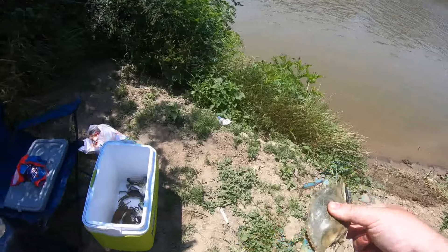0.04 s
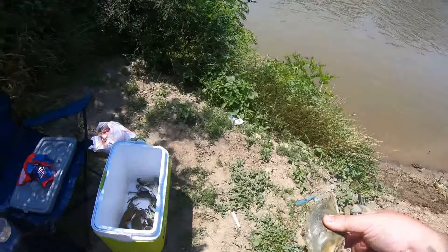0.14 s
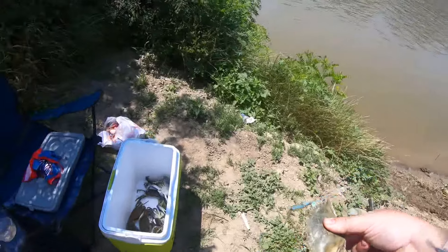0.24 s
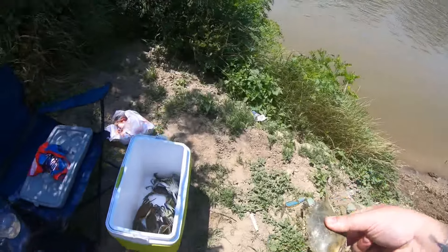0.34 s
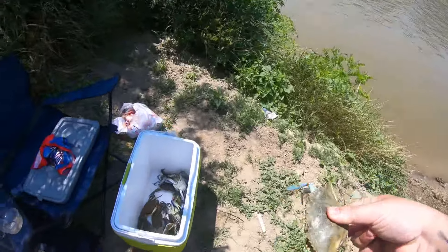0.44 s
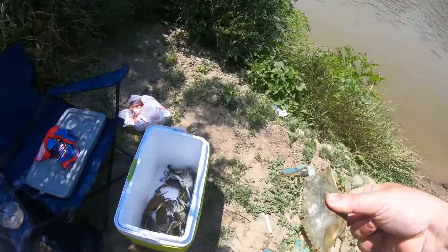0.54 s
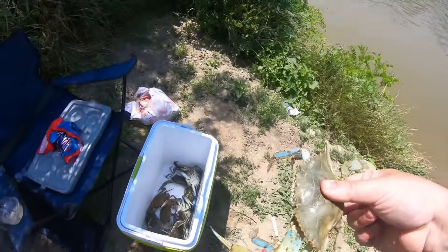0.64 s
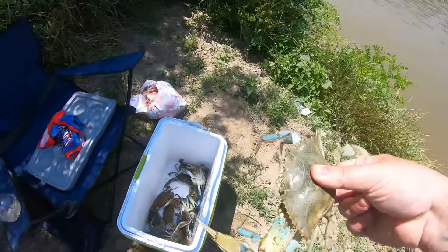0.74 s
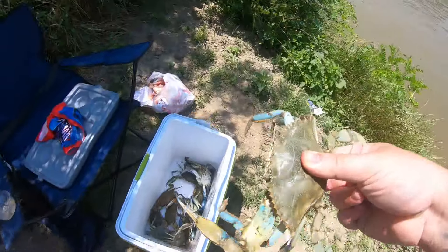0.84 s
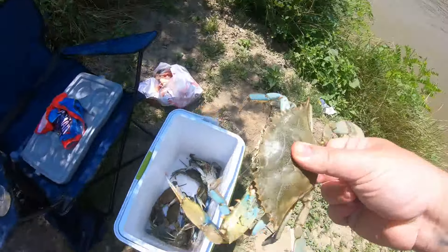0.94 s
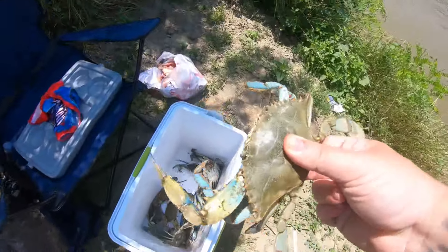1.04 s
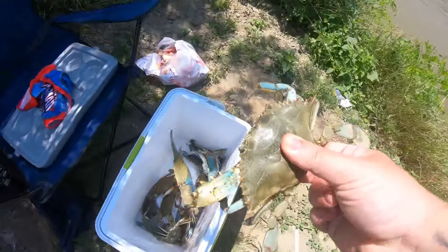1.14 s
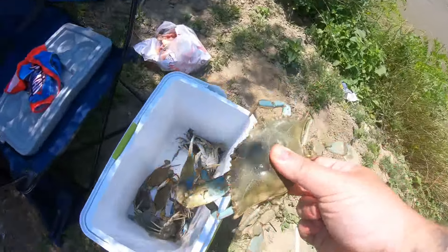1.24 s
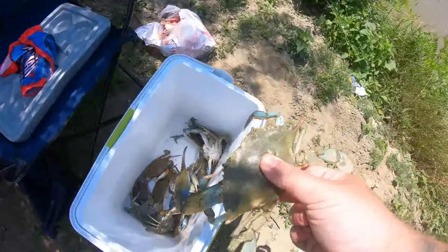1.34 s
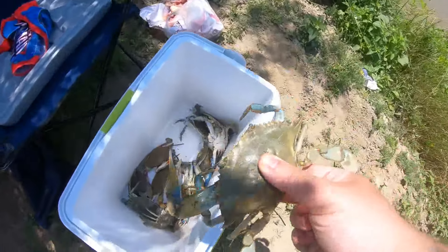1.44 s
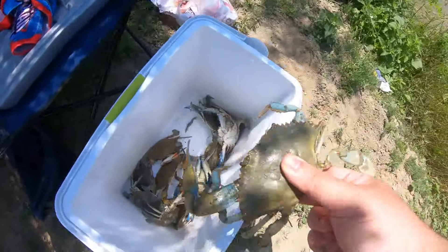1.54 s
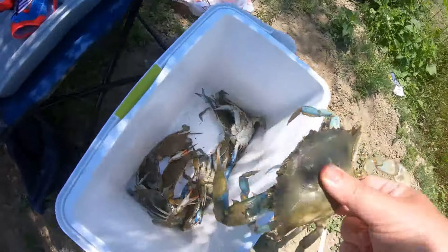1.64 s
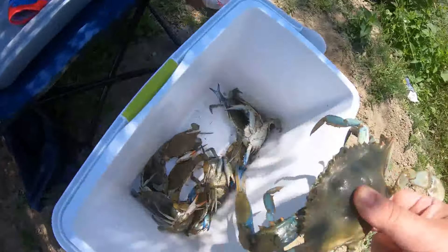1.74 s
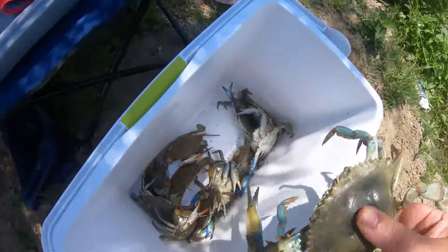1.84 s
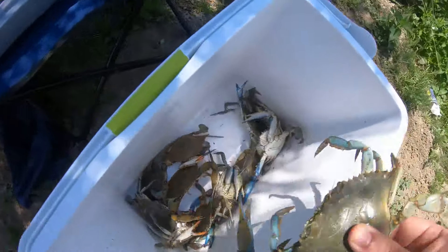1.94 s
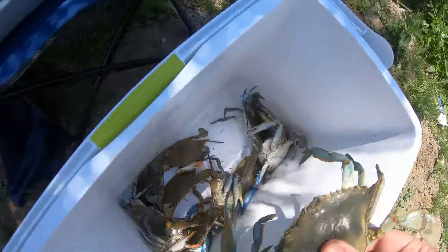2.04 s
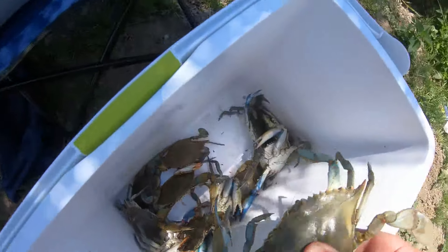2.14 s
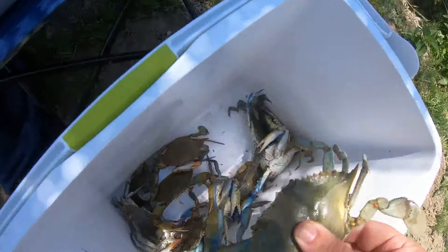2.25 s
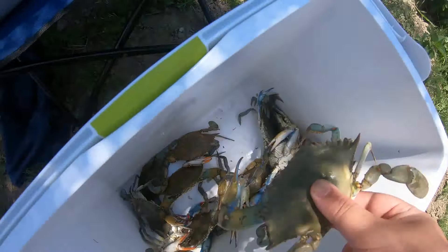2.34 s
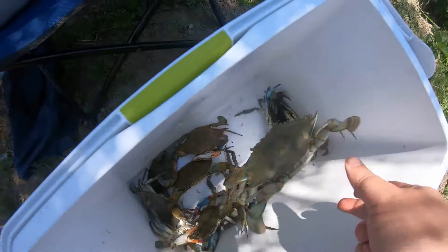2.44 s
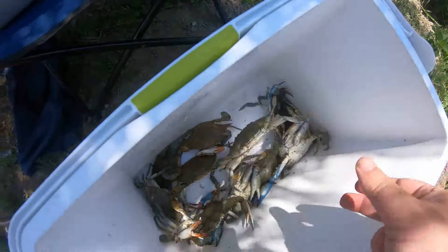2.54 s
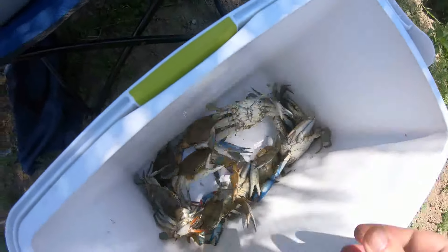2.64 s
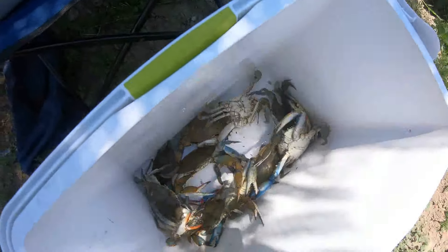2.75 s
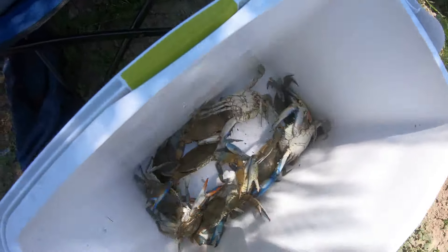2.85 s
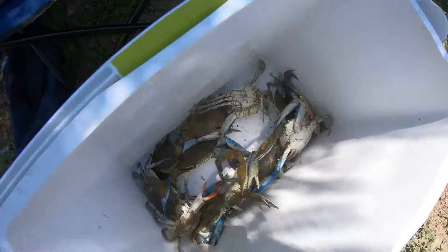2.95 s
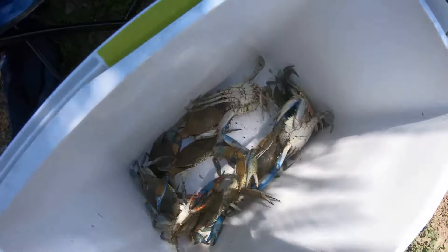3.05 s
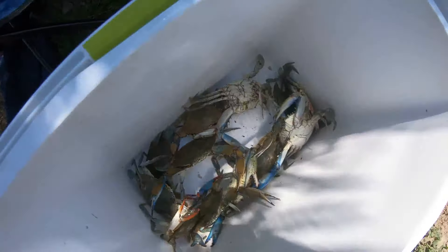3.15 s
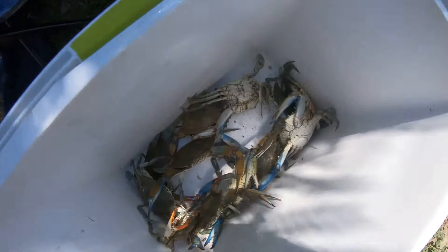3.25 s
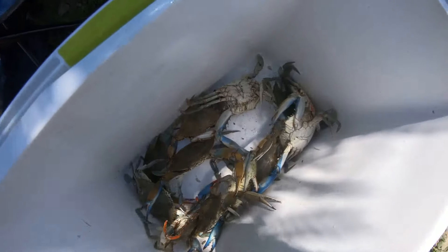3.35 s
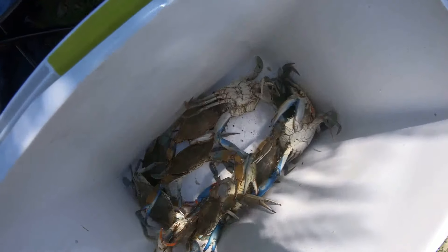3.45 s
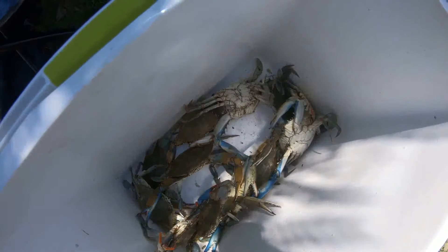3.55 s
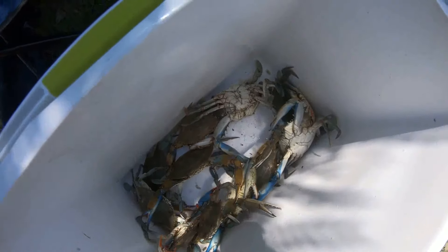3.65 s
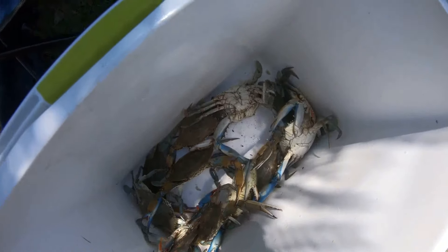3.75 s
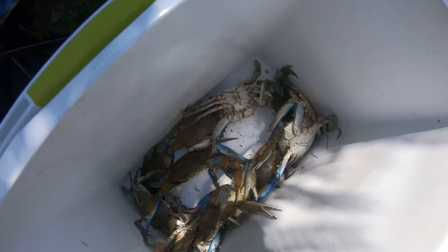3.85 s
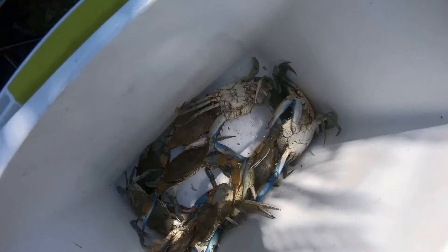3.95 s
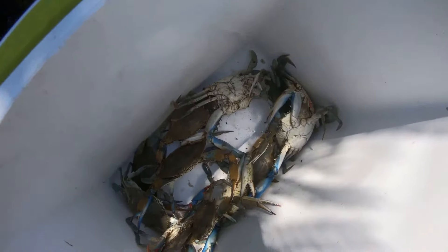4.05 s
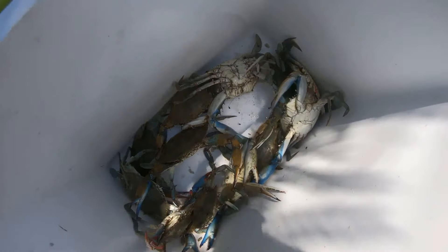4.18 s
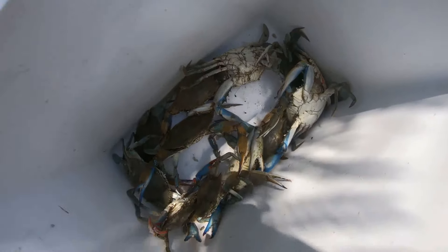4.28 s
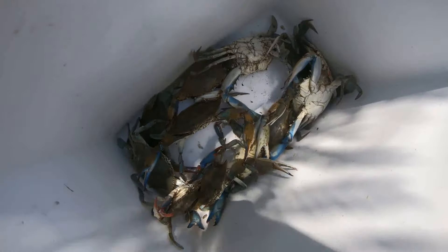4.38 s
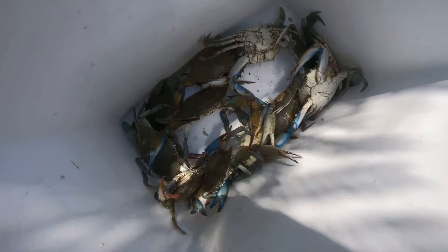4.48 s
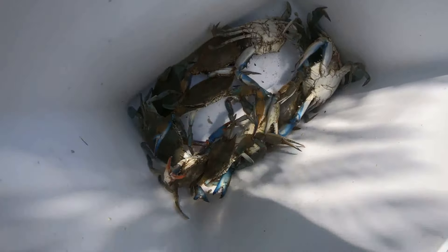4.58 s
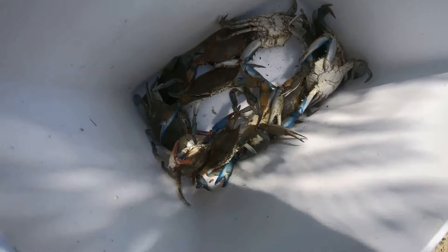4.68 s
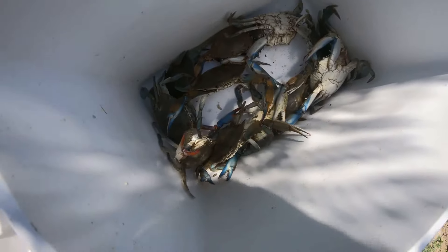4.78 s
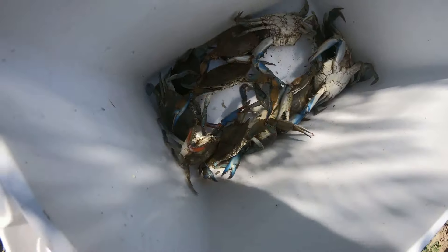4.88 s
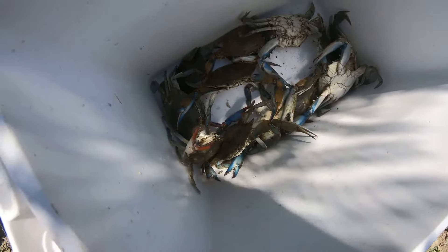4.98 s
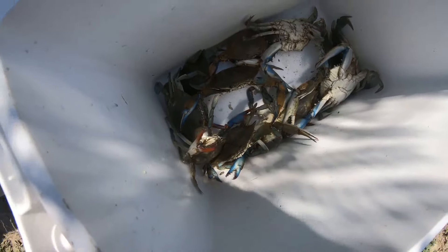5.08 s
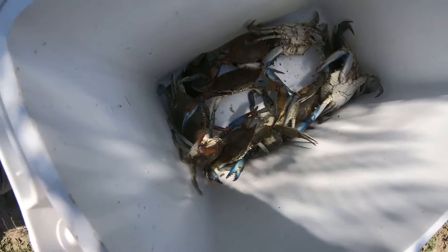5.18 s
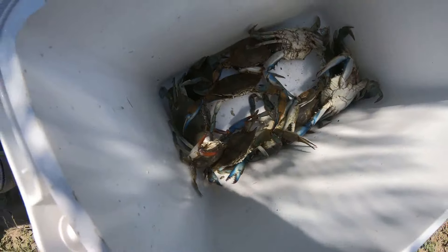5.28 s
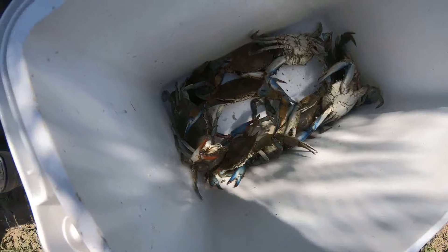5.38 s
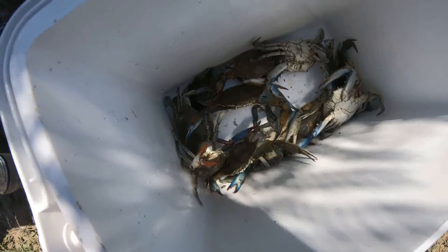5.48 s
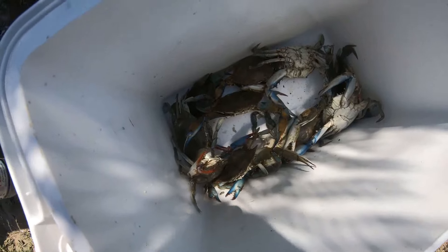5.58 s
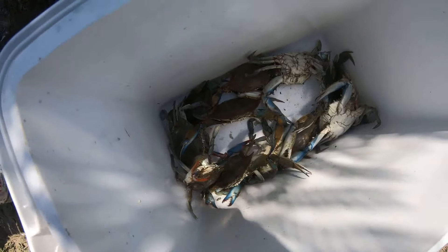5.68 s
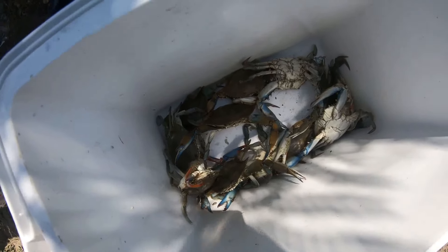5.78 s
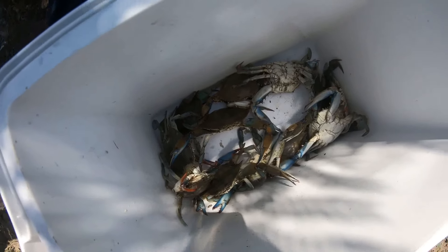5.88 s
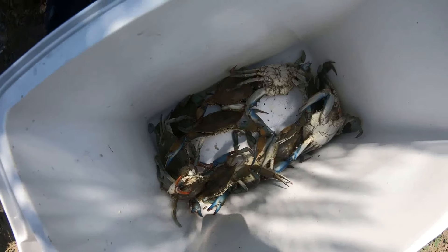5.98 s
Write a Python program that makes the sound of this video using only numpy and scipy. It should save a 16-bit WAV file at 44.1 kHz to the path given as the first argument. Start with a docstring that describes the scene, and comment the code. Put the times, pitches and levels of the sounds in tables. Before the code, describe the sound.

Outdoors with light wind rumble and a fading insect hiss, a crab drops into a plastic cooler with a hard hollow bang, claws rattling, then quieter ticking.

```python
"""Crab dropped into a cooler

A live crab is carried to a plastic cooler on a river bank and dropped onto the others.
Short bursts of noise ring like shells and plastic; fading low tones make the hollow walls boom.
One effort curve drives the scrabbling, light taps and soft nudges, and sinks as the crabs settle.
Behind them, shaped noise makes insects, open air and light wind; low tones make a far engine's hum."""
import sys
import numpy as np
from scipy import signal
from scipy.fft import rfft, irfft
from scipy.io import wavfile
from scipy.ndimage import uniform_filter1d

SR = 44100
rng = np.random.default_rng(int(sys.argv[2]) if len(sys.argv) > 2 else 0)


def generate_wav(sig):
    """Save sig (samples, or channels by samples) to the path in sys.argv[1] as 16-bit PCM at SR."""
    pcm = np.round(np.clip(np.atleast_2d(sig).T, -1, 1) * 32767).astype(np.int16)
    wavfile.write(sys.argv[1], SR, pcm)


N = 265482
TIME = np.arange(N) / SR

# blows on the cooler: [t/s, boom peak level/dB, favoured f/Hz,
# hard knock level/dB against the peak before a 2 dB cut, ring time as a factor on the walls' own]
THUMPS = [(.038, -37, 290, -2, 0.058), (0.065, -34, 225, -12, 0.17), (1.195, -37, 180, -27, 2.9),
          (1.3, -23.5, 265, -22, 0.26), (1.4299, -20, 225, -34, 0.78), (2.052, -37.5, 209, -14, 1.1),
          (2.353, -26.5, 249, -30, 0.77), (2.487, -30, 173, -42, 1.6), (2.515, -35, 174, -34, 1.7),
          (2.693, -19.5, 256, -1, 1.9), (2.7262, -3, 212, -3.5, 0.79), (2.806, -34, 245, -9, 0.34),
          (2.8859, -7.5, 267, -40, 0.97), (2.9414, -28, 234, -9, 1.1), (3.12, -25, 164, -1, 0.86),
          (3.176, -33.5, 290, -4, .73), (3.469, -38.5, 231, -20, 1), (4.565, -33, 450, 1, 1.4),
          (4.584, -32, 420, 4.5, 2.3), (5.012, -44, 191, -28, 0.74)]
# louder shell clicks: [t/s, shell level/dB, shell f/Hz, plastic clack level/dB and
# bright snap level/dB, both against the shell before a 1 dB cut, decay/s]
CLICKS = [(.064, -53, 1490, 6.5, -21, .005), (.832, -55.5, 1790, 5, -20, 0.0036),
          (1.188, -53.5, 2800, 5.5, -24, 0.0046), (1.3, -44, 1480, -13, -20, 0.0012),
          (1.417, -41.5, 1610, 0, -13, 0.015), (1.461, -38.5, 2220, -23, -20, 0.0015),
          (1.4872, -35.5, 2930, -8.5, -20, 0.0012), (1.533, -53.5, 1570, 2.5, 1, 0.009),
          (1.6973, -44.5, 2750, -6.5, -17, 0.016), (1.801, -46.5, 2780, -1.5, -9, 0.015),
          (1.936, -53, 2970, -14, -6, .002), (2.076, -46, 2260, 1.5, -8, 0.017),
          (2.0878, -37, 1940, -1.5, -15.5, 0.0012), (2.2394, -39.5, 2930, -3, -23, 0.0043),
          (2.353, -31.5, 1720, 3, -19.5, 0.0024), (2.381, -47.5, 2680, 3.5, -17, 0.0077),
          (2.514, -40, 2330, 1, -41, 0.026), (2.6715, -44, 3540, -3, 2, .018),
          (2.6837, -26, 2360, -2, -1.5, 0.0039), (2.6954, -24.5, 1340, -9, -5.5, 0.0047),
          (2.7057, -28, 2220, 1, -20, .0025), (2.7118, -20.5, 1580, 2.5, -7.5, 0.01),
          (2.719, -20, 2860, -3, -15, 0.0027), (2.723, -26, 2920, -2.5, -5, 0.003),
          (2.8, -40.5, 3120, -10, -7, 0.0026), (2.813, -31.5, 1410, 0, -16.5, 0.0049),
          (2.843, -30, 1360, -4.5, -15, 0.019), (2.8796, -28.5, 1380, 3.5, -14, 0.0056),
          (2.8864, -29.5, 2630, 1, -3, 0.0083), (2.898, -22.5, 1980, -4, -17, 0.003),
          (2.9417, -31.5, 1740, 2.5, -11, 0.002), (2.966, -35, 1850, 0, -13, 0.0056),
          (3.091, -43.5, 1470, 6, -8, .014), (3.121, -45.5, 1620, 7, -10, 0.0047),
          (3.203, -40.5, 1630, -4, -33, 0.0046), (3.414, -45.5, 2470, -19, -19, 0.0075),
          (3.47, -45.5, 2600, -25, -9, 0.0069), (3.5512, -48.5, 1540, -3, -3, 0.0037),
          (3.606, -44.5, 1450, -3, -4, 0.007), (3.634, -48.5, 1490, 5.5, -27, 0.01),
          (3.685, -48, 2550, -12, -21, .004), (3.7073, -47, 2070, 1.5, -22, 0.0018),
          (3.8438, -47, 2940, -8, -24, 0.0051), (3.9315, -44.5, 1700, -21, -31, 0.0021),
          (3.966, -45, 2300, 0, -28, 0.013), (4.035, -49.5, 2670, -20, -27, 0.0021),
          (4.2323, -53.5, 3070, -10, -13, 0.009), (4.4935, -44.5, 2870, -20, -21, 0.013),
          (4.499, -41, 1560, -5.5, -15, 0.0033), (4.5635, -32, 1670, -6, -38, 0.00059),
          (4.581, -42, 1700, -4, -44, 0.0039), (4.611, -41, 1720, -19, -38, 0.0014),
          (4.7715, -46.5, 1440, -0.5, -9, 0.0044), (4.9979, -47, 3140, -19, -16, 0.0021),
          (5.1, -48.5, 3100, -9, -16.5, 0.0021), (5.195, -55.5, 1810, -3.5, -32, 0.0022),
          (5.3874, -47.5, 3070, -16, -15, .0025), (5.479, -56.5, 3280, -6, -25, 0.0019),
          (5.8012, -52, 2830, -17, -11.5, 0.0016)]
# short rough scrapes: handling at the start, a low ring at 4.567 s, otherwise claws skidding
# on plastic and shell: [t/s, length/s, squeak level/dB, squeak f/Hz,
# plastic clack level/dB against the squeak]
SCRAPES = [(.005, 0.057, -69, 1370, 18.5), (0.618, 0.017, -56.5, 2500, -11), (.656, .016, -50, 2250, -24),
           (0.685, 0.012, -44, 1770, -16), (1.722, 0.048, -59, 2610, -18), (1.833, .012, -52, 2840, -18),
           (2.222, 0.064, -45.5, 463, -25), (2.358, 0.028, -51.5, 1620, 7), (3.282, .028, -52.5, 2410, -5),
           (4.335, 0.047, -55, 2360, -14), (4.567, 0.085, -51.5, 494, -24), (4.581, 0.013, -36, 1690, -3),
           (4.838, 0.033, -56.5, 2200, -19), (5.109, 0.013, -51.5, 2060, -5.5)]
# how hard the crabs scrabble: [t/s, effort level/dB]
EFFORT = [(0, -4.5), (.55, -9), (.85, -4.5), (1.12, -9), (1.42, 7.5), (1.6, -5.5), (1.8, 6), (1.94, -0.5),
          (2.08, 6.5), (2.28, 6.5), (2.43, 1.5), (2.52, 11), (2.65, 0.5), (2.83, 21.5), (3.0, 10),
          (3.19, 6.5), (3.34, -6), (3.43, 4.5), (3.8, -1.5), (4.35, 0), (4.47, -5.5), (4.98, 2),
          (5.09, -10), (5.4, -3), (5.88, -9), (6.02, -5)]
# cooler walls: [f/Hz, relative level/dB, time to fade by 60 dB/s at ring factor 1]
WALLS = [(114.7, 1.5, 0.53), (185.2, 5, 0.15), (221.2, 4, 0.15), (246.7, 1.5, 0.064), (300, -5.5, .07),
         (320, 16, 0.036), (395.5, -15.5, 0.1), (500, -6, 0.12)]
# resonances of the plastic liner: [f/Hz, width/Hz, relative level/dB]
LINER = [(598, 150, 9), (828.6, 20, 13.5), (926, 70, 7), (1113, 284, 10.5), (1423, 130, 8.5)]
# resonances of the shells: [f/Hz, width/Hz, relative level/dB]
SHELLS = [(1496, 210, -1), (2295, 290, -1), (2800, 390, -4), (3580, 500, -7)]
# treble of a snapping shell edge: [f/Hz, relative level/dB]
SNAP_SPECTRUM = [(2500, -38), (4500, 3.5), (7000, 4), (9500, 0.5), (11500, -14.5), (15500, -24)]
# scratching on shell: [f/Hz, relative level/dB]
SCRATCH_SPECTRUM = [(1000, -4.5), (1600, 6), (2900, 2), (3800, -1.5), (6000, -8.5)]
# gritty rasp of slipping legs: [f/Hz, relative level/dB]
GRIT_SPECTRUM = [(2500, 15.5), (4400, 27), (5200, 23.5), (6300, 14.5), (9300, 17.5), (11500, -16),
                 (15500, -50)]

# light leg taps between the louder clicks; levels at 0 dB effort, clack and snap as in CLICKS
TAPS_PER_S, TAP_DB, TAP_SPREAD_DB = 11, -51.5, 1.5
TAP_FOLLOW = 0.57  # dB louder per dB of effort
TAP_CLACK_DB, TAP_SNAP_DB, TAP_DECAY_S, TAP_SCATTER_OCTAVES = -5.5, -18.5, 0.0033, .16
# the taps grow thinner as the crabs settle: [t/s, typical f/Hz]
TAP_PITCH = [(.7, 1900), (3.5, 2450), (5.6, 3550)]
# soft nudges of shifting bodies against the walls; level at 0 dB effort, knock as in THUMPS
NUDGES_PER_S, NUDGES_FROM_S, NUDGE_DB, NUDGE_SPREAD_DB = 6, 1.0, -44, 3
NUDGE_FOLLOW = 0.38  # dB louder per dB of effort
NUDGE_HZ, NUDGE_SCATTER_OCTAVES, NUDGE_KNOCK_DB, NUDGE_RING = 189.5, .1, -23, 0.97
# a brief contact rings at the shell's own pitch; a long chatter smears it, unless the touch is dull
CLEAN_SHARE, SMEAR_S, DULL_SNAP_DB, HARD_SNAP_DB = 0.88, 0.01, -41, -25
SLIPS_PER_S = 380  # average rate within a scrape

# near insect's hiss: [t/s, level/dB]
INSECT_LEVEL = [(0, -56.5), (.6, -59), (.7, -66), (.93, -83), (1.0, -64), (1.1, -101), (1.42, -66.5),
                (1.6, -87), (1.7, -69), (2.1, -100)]
# colour of that hiss: [f/Hz, relative level/dB]
HISS_SPECTRUM = [(1000, -36), (2250, -5), (2360, 6.5), (2480, -12.5), (4800, -9), (5700, -12.5),
                 (6450, -7.5), (7300, -7.5), (8700, -1.5), (9600, 0), (10400, -11), (14500, -27.5)]
# far insect's trill: [t/s, level/dB]
TRILL_LEVEL = [(0, -100), (3.0, -90), (3.4, -88), (3.8, -81), (4.1, -97), (4.8, -103), (5.4, -83),
               (6.0, -81)]
# far engine's hum, before its swells and slow rise and fall: [f/Hz, rms level/dB]
ENGINE = [(41.3, -56.5), (63.1, -47.5), (82.4, -50.5), (124, -63), (206, -65.5)]
# open air: [f/Hz, relative level/dB]
AIR_SPECTRUM = [(175, 4.5), (260, -13), (420, -24), (650, -18), (1200, 1), (3000, -12.5), (6000, -17.5),
                (9500, -23.5), (12000, -42), (16000, -45)]
# low rush of the open river bank: [f/Hz, relative level/dB]
RUSH_SPECTRUM = [(120, -13.5), (220, -4.5), (310, 0), (420, -13), (570, -19.5), (740, -4.5), (950, -24),
                 (2000, -51)]
# the rush fades as the microphone leans into the cooler: [t/s, level/dB]
OPENNESS = [(0, -59.5), (.65, -61.5), (1.1, -65), (3, -76.5), (6, -87)]
# wind rumble: [f/Hz, relative level/dB]
WIND_SPECTRUM = [(15, -33), (30, 2), (55, 0), (100, -3), (180, -3.5), (260, -22.5), (450, -23), (1000, -49)]
# slow rise and fall of the rumble and hum: [t/s, relative level/dB]
RUMBLE_LEVEL = [(0, 4.5), (.5, -3), (1.1, 2.5), (2.0, -2), (2.7, 1), (3.1, -7), (3.7, -3), (4.4, 1),
                (5.3, 0.5), (6.0, 0)]
# side against middle of the two microphone ports: [f/Hz, level/dB]
WIDTH = [(30, -9), (70, -15), (200, -25), (380, -21), (700, -13), (1300, -7), (2400, -10), (4400, -7),
         (8000, 2), (15000, 3)]
# left port against right port: [f/Hz, level/dB]
LEAN = [(60, -.9), (280, -1.5), (600, -4.8), (1200, -1), (3000, .5), (9000, .8)]
CUT_HZ = 15800


def amp(db):
    """Turns decibels into gain."""
    return 10 ** (np.asarray(db) / 20)


def unit(x):
    """Scales each channel to rms 1."""
    return x / np.sqrt(np.mean(x ** 2, -1, keepdims=True) + 1e-20)


def spectrum(points):
    """Draws gain against frequency through (Hz, dB) points."""
    hz, db = np.transpose(points)
    return lambda f: amp(np.interp(np.log(f + 1), np.log(hz), db))


def resonances(modes):
    """Gives gain against frequency of (Hz, width, dB) resonances, with steep skirts far from them."""
    def gain(f):
        power = 0
        for hz, width, db in modes:
            peak = amp(2 * db) / (1 + (2 * (f - hz) / width) ** 2)
            power = power + peak / (1 + np.log2((f + 1) / hz) ** 4)
        return np.sqrt(power)
    return gain


def note_at(hz, width):
    """Gives a single resonance taken twice, for a clear pitch."""
    return lambda f: resonances([(hz, width, 0)])(f) ** 2


def colour(x, gain):
    """Filters with the given gain against frequency, without sounding ahead of the input."""
    size = 2048
    g = gain(abs(np.fft.fftfreq(size, 1 / SR)))
    log_gain = np.log(np.maximum(g, g.max() * 1e-4))
    response = np.fft.ifft(np.exp(np.conj(signal.hilbert(log_gain)))).real[:size // 2]
    return signal.fftconvolve(x, response[None], axes=1)[:, :x.shape[1]]


def noise(points):
    """Makes steady middle and side noise of the given spectrum, at rms 1."""
    white = rfft(rng.standard_normal((2, N)))
    return unit(irfft(white * spectrum(points)(np.fft.rfftfreq(N, 1 / SR)), N))


def drift(rate):
    """Wanders at random through new values, rate of them a second, at rms 1."""
    knots = rng.standard_normal(512)
    return unit(np.interp(TIME * rate, np.arange(len(knots)), knots))


def level(table):
    """Turns an (s, dB) curve into gain over time."""
    return amp(np.interp(TIME, *np.transpose(table)))


def add(mix, s, sound):
    """Adds a sound to the mix at a time in seconds."""
    part = mix[:, max(0, round(s * SR)):][:, :sound.shape[1]]
    part += sound[:, :part.shape[1]]


def thumps(rows, knock_trim_db=-2, focus_octaves=0.23, rise_s=0.0046, knock_hz=600, knock_t60=.035):
    """A crab's weight sets the hollow walls booming; a hard landing also knocks the liner."""
    out, t = np.zeros((2, N)), np.arange(SR // 2) / SR
    for s, db, favoured_hz, knock_db, ring in rows:
        boom = np.zeros(len(t))
        for hz, wall_db, t60 in WALLS:
            focus = 1 + (np.log2(hz / favoured_hz) / focus_octaves) ** 2
            boom += amp(wall_db - 60 * t / (t60 * ring)) * np.sin(2 * np.pi * hz * t) / focus
        boom *= (1 - np.exp(-2 * t / (rise_s * ring))) ** 2  # the wide wall takes a moment to swing
        knock = np.sin(2 * np.pi * knock_hz * rng.uniform(1.0, 1.03) * t)
        knock *= amp(knock_db + knock_trim_db - 60 * t / knock_t60)
        knock *= np.minimum(t * knock_hz, 1)  # soft start
        add(out, s, amp(db) * np.tile(boom / abs(boom).max() + knock, (2, 1)))
    return out


def clicks(rows, trim_db=-1, note_width_hz=700, mottle_db=4, rise_share=.2, tick=2.6):
    """A contact chatters for a few ms: the shell rings, the liner clacks and the edge spits treble."""
    out, t = np.zeros((2, N)), np.arange(2048) / SR
    to_10_ms = np.sqrt(.01 / t[-1])  # levels are stated as if spread over 10 ms
    for s, db, hz, clack_db, snap_db, decay in rows:
        force = rng.standard_normal((2, len(t))) * np.exp(-t / max(decay, 1 / SR))
        force *= np.minimum(t / (rise_share * decay), 1)
        force[:, 20] += tick  # one sharp touch near the start

        hardness = np.interp(snap_db, [DULL_SNAP_DB, HARD_SNAP_DB], [0, 1])
        clean = CLEAN_SHARE * np.exp(-decay / SMEAR_S)
        ring = np.clip(1 - hardness * (1 - clean), 0, 1)
        note = unit(colour(force, note_at(hz, note_width_hz)))
        smear = unit(colour(force, lambda f: resonances(SHELLS)(f) * spectrum(SCRATCH_SPECTRUM)(f)))
        shell = unit(np.sqrt(ring) * note + np.sqrt(1 - ring) * smear)

        stiffness = rng.uniform(0.96, 1.04)  # the liner's pitch varies from spot to spot
        plastic = unit(colour(force, lambda f: resonances(LINER)(f / stiffness)))

        # every spot of a shell has its own peaks and dips in the treble
        mottle = mottle_db * np.tanh(rng.standard_normal(28))
        spot = spectrum(np.c_[np.geomspace(2000, 16000, num=28), mottle])
        edge = unit(colour(force, lambda f: spectrum(SNAP_SPECTRUM)(f) * spot(f)))

        sound = shell + amp(clack_db + trim_db) * plastic + amp(snap_db + trim_db) * edge
        add(out, s, to_10_ms * amp(db) * sound)
    return out


def scrapes(jitter=.14, squeak_width_hz=750, shell_db=-11, rub=0.039):
    """Each short rough scrape is a quick uneven train of slips with a little rubbing noise."""
    out, t = np.zeros((2, N)), np.arange(4096) / SR
    for s, length, db, hz, clack_db in SCRAPES:
        slips = np.cumsum(abs(1 + jitter * rng.standard_normal(64))) / SLIPS_PER_S
        pulses = np.histogram(slips - slips[0], len(t), (0, t[-1]))[0]
        force = pulses + rub * rng.standard_normal((2, len(t)))
        force *= np.sqrt(abs(np.sin(np.pi * np.minimum(t / length, 1))))  # swells and fades
        sound = unit(colour(force, note_at(hz, squeak_width_hz)))
        sound += amp(shell_db) * unit(colour(force, resonances(SHELLS)))
        sound += amp(clack_db) * unit(colour(force, resonances(LINER)))
        add(out, s, amp(db) * np.sqrt(length / t[-1]) * sound)
    return out


def grains(rate, spread_db):
    """Scatters tiny contacts of uneven size at random, as middle and side."""
    size = amp(spread_db * np.minimum(rng.exponential(1, N), 3)) * (rng.random(N) < rate / SR)
    return size * rng.choice([-1, 1], (2, N))


def crawling(spread_db=3.0, tip_width_hz=380, drag_follow=1.35):
    """Legs scratch shells, liner and walls in short bouts of their own; all grow with effort."""
    shell_db, push_db, grit_db, drag_db = -59.0, -61.0, -70.5, -58  # before effort
    contacts_per_s, bout_db, flurry_db = 160, 6, 2
    # the legs also kick together, in short flurries
    effort = level(EFFORT) * amp(flurry_db * np.clip(drift(rate=26), -2, 1.5))
    tips = []
    for _ in range(9):
        bouts = amp(bout_db * np.minimum(drift(rate=42), 2))
        tips.append(grains(contacts_per_s, spread_db) * bouts)

    pitches = np.geomspace(1400, 4000, len(tips))  # shells of different sizes
    shell = sum(colour(tip, resonances([(hz, tip_width_hz, 0)])) for tip, hz in zip(tips, pitches))
    scratch = unit(colour(shell, spectrum(SCRATCH_SPECTRUM)))
    push = unit(colour(sum(tips[::2]), resonances(LINER)))
    # each slip rasps for about 3 ms
    rasp = rng.standard_normal((2, N)) * uniform_filter1d(abs(sum(tips[1::2])), size=130)
    grit = unit(colour(rasp, spectrum(GRIT_SPECTRUM)))
    # a soft drag stirs only the low wall tones
    walls = resonances([(hz, 5 / t60, db) for hz, db, t60 in WALLS[:3]])
    drag = unit(colour(sum(tips), walls))
    scrabble = amp(shell_db) * scratch + amp(push_db) * push + amp(grit_db) * grit
    return effort * scrabble + effort ** drag_follow * amp(drag_db) * drag


def taps():
    """Legs tap lightly at loosely spaced random moments; gives rows like those of CLICKS."""
    when, typical_hz = np.transpose(TAP_PITCH)
    chance = rng.standard_normal((160, 5))
    times = when[0] + (np.arange(len(chance)) + 2 * rng.random(len(chance))) / TAPS_PER_S
    efforts = np.interp(times, *np.transpose(EFFORT))
    rows = []
    for s, effort, (size, pitch, clack, snap, decay) in zip(times, efforts, chance):
        if s < TIME[-1]:
            rows.append((s,
                         TAP_DB + TAP_FOLLOW * effort + TAP_SPREAD_DB * size,
                         np.interp(s, when, typical_hz) * 2 ** (TAP_SCATTER_OCTAVES * pitch),
                         TAP_CLACK_DB + TAP_SPREAD_DB * clack,
                         TAP_SNAP_DB + 2 * TAP_SPREAD_DB * snap,
                         TAP_DECAY_S * 2 ** (decay / 2)))
    return rows


def nudges():
    """Bodies bump the walls at loosely spaced random moments; gives rows like those of THUMPS."""
    chance = rng.standard_normal((100, 2))
    times = NUDGES_FROM_S + (np.arange(len(chance)) + rng.random(len(chance))) / NUDGES_PER_S
    efforts = np.interp(times, *np.transpose(EFFORT))
    rows = []
    for s, effort, (size, pitch) in zip(times, efforts, chance):
        if s < TIME[-1]:
            db = NUDGE_DB + NUDGE_FOLLOW * effort + NUDGE_SPREAD_DB * size
            hz = NUDGE_HZ * 2 ** (NUDGE_SCATTER_OCTAVES * pitch)
            rows.append((s, db, hz, NUDGE_KNOCK_DB, NUDGE_RING))
    return rows


def cooler(x, wet_db=-8, t60=0.073, first_s=0.0013, bounces_per_s=2500):
    """Sound bounces briefly between the close walls."""
    t = np.arange(SR // 6) / SR
    bounces = rng.standard_normal((2, len(t))) * (rng.random((2, len(t))) < bounces_per_s / SR)
    bounces *= (t > first_s) * amp(-60 * t / t60)
    echo = signal.fftconvolve(x, unit(bounces) / np.sqrt(len(t)), axes=1)[:, :N]
    return x + amp(wet_db) * echo


def insects(shimmer_db=2, trill_hz=8400, trill_width_hz=130):
    """One insect hisses in the weeds and dies away in spurts; a thin far trill comes later."""
    z = signal.stft(noise(HISS_SPECTRUM), nperseg=512)[2]
    # random patches over pitch and time make the hiss shimmer
    patches = uniform_filter1d(rng.standard_normal(z.shape[1:]), size=6, axis=0)
    patches = uniform_filter1d(patches, size=9, axis=1)
    hiss = signal.istft(z * amp(shimmer_db * patches / patches.std()))[1][:, :N]
    trill = unit(colour(rng.standard_normal((2, N)), note_at(trill_hz, trill_width_hz)))
    return level(INSECT_LEVEL) * hiss + level(TRILL_LEVEL) * trill


def outdoors(air_db=-64, waver_rad=0.33, swell_db=0.96, hum_follow=0.91):
    """A far engine's wavering low tones rise and fall with the rumble, amid open air and rush."""
    hum = np.zeros(N)
    for hz, db in ENGINE:
        swell = amp(db + swell_db * drift(rate=2.52))
        turns = hz * TIME + rng.random()
        hum += swell * np.sqrt(2) * np.sin(2 * np.pi * turns + waver_rad * drift(rate=3.145))
    engine = np.array([hum * level(RUMBLE_LEVEL) ** hum_follow, np.zeros(N)])  # middle only
    return engine + amp(air_db) * noise(AIR_SPECTRUM) + level(OPENNESS) * noise(RUSH_SPECTRUM)


def wind(eddy_db=-56.5, gust_db=2):
    """Light wind rumbles unsteadily at the microphone, partly different at each port."""
    gusts = amp(eddy_db + gust_db * drift(rate=3.68)) * level(RUMBLE_LEVEL)
    middle, side = noise(WIND_SPECTRUM) * gusts
    return np.array([middle + side, middle - side])


def ports(x):
    """Two close microphone ports hear bass nearly alike and treble more differently."""
    f = np.fft.rfftfreq(N, 1 / SR)
    width, lean = spectrum(WIDTH)(f), np.sqrt(spectrum(LEAN)(f))
    middle, side = rfft(x) / np.sqrt(1 + width ** 2)
    side = 1j * side * width  # the difference between close ports is a quarter turn out of phase
    return irfft(np.array([(middle + side) * lean, (middle - side) / lean]), N)


def scene():
    """Crabs in the cooler, and the river bank around them."""
    shells = clicks(CLICKS + taps()) + scrapes() + crawling()
    blows = thumps(THUMPS + nudges())
    bank = insects() + outdoors()
    return ports(cooler(shells) + blows + bank) + wind()


def record(dry):
    """A steep filter takes away the treble above CUT_HZ."""
    lowpass = signal.firwin(511, CUT_HZ, window=("kaiser", 9), fs=SR)
    return signal.oaconvolve(dry, lowpass[None], "same")


dry = scene()
out = record(dry)
generate_wav(out)
```